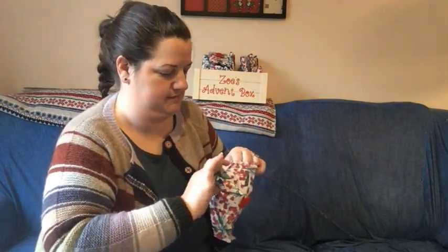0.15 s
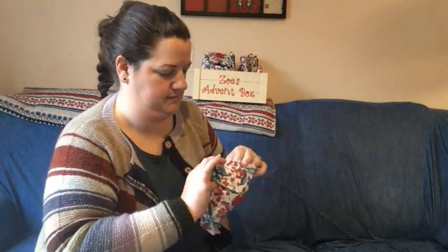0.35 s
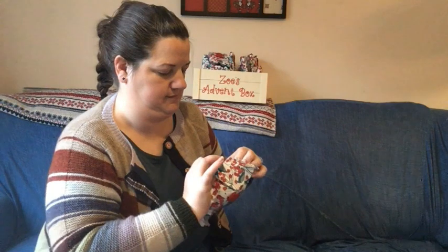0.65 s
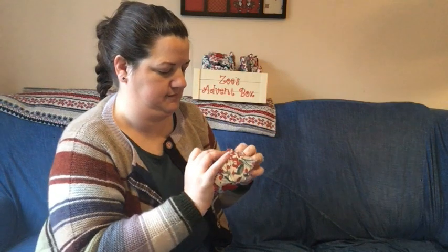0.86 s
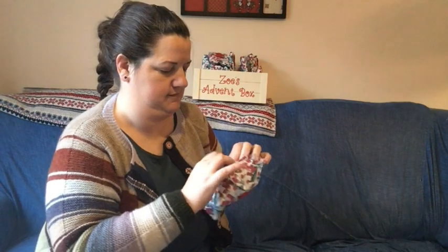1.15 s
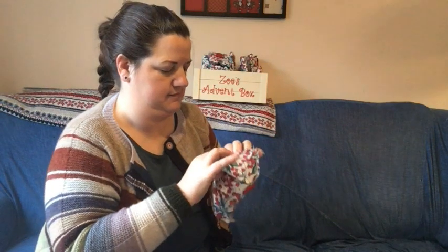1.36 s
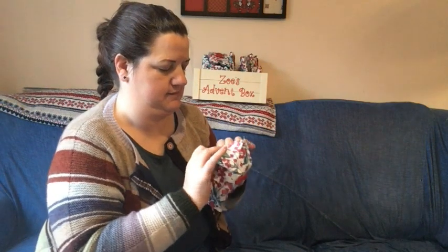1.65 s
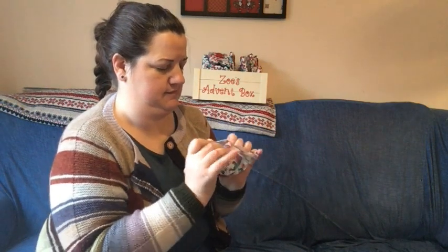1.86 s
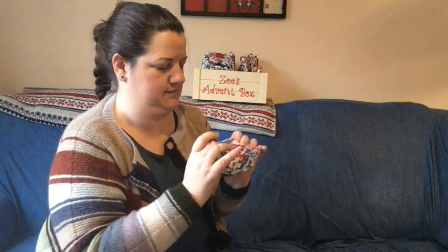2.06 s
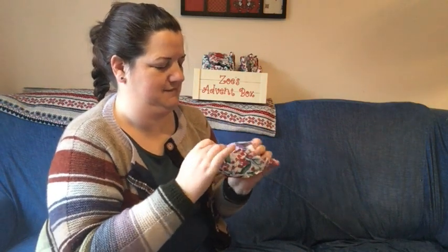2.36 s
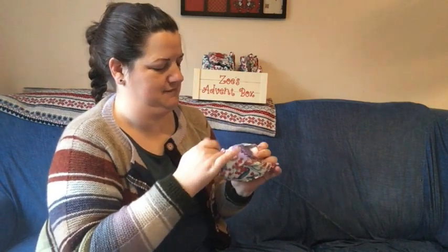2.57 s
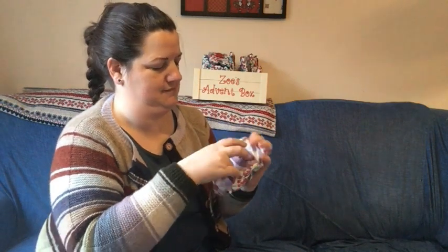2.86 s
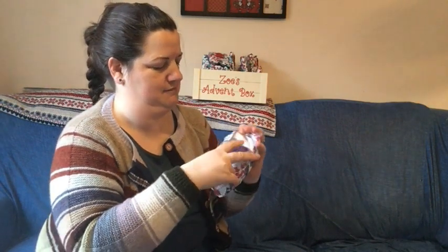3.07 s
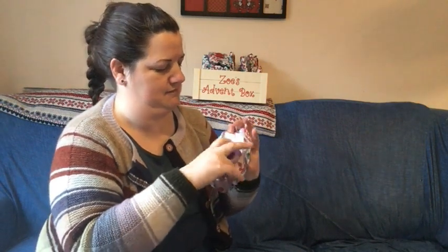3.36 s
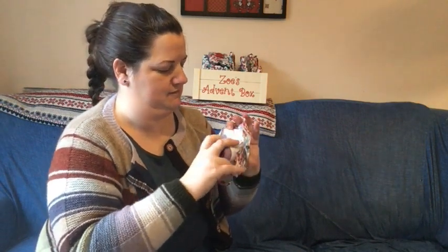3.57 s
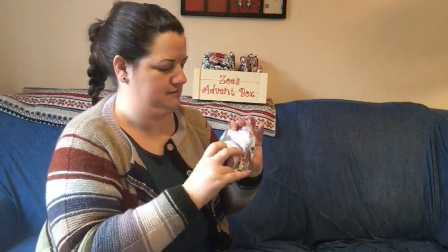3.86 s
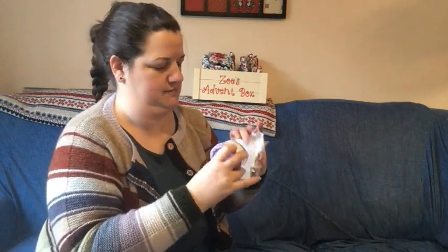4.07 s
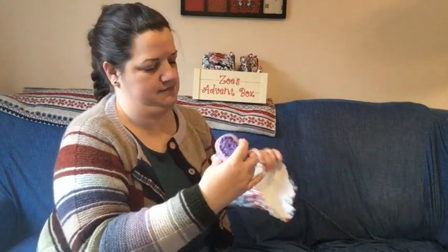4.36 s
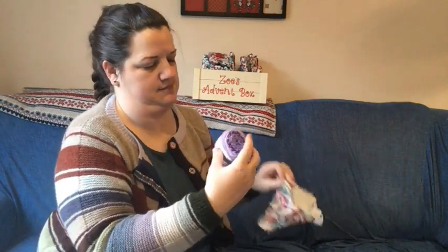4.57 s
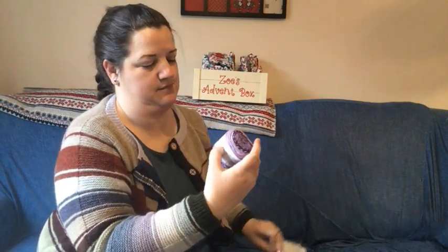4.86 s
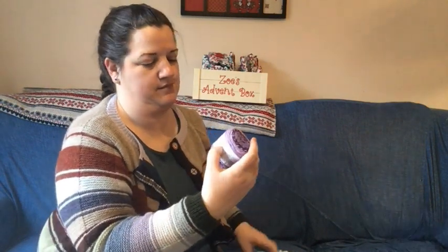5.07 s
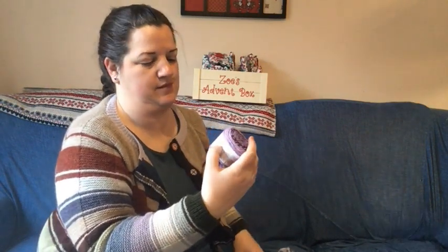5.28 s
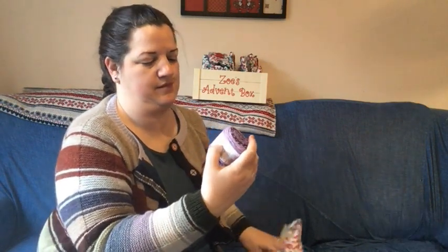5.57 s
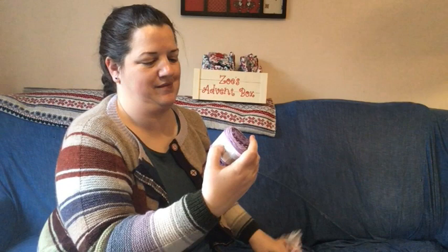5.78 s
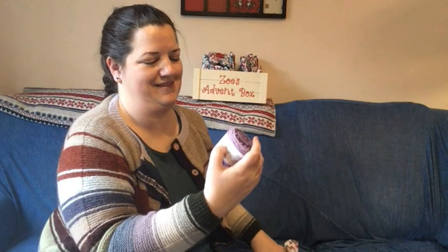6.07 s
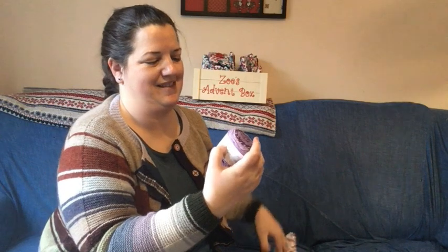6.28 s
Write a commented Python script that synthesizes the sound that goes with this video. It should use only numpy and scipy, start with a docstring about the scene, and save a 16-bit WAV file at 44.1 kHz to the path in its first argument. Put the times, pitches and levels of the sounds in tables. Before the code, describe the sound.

Stiff wrapping paper is handled fairly close by in a quiet living room, over a faint, steady low hum. From the start it rustles in short, uneven strokes, with loud, sharp snaps between about 0.5 and 0.9 seconds. After lighter picking, a quick, loud rip comes at 1.7 seconds, followed by a slower, thinner tear from about 2.3 to 2.5 seconds. Dense crinkling continues as the small gift is eased out, with a strong crackle at 3 seconds and a few soft hand bumps. The rustle softens, and from about 4.1 to 4.8 seconds there are only slight paper sounds. Crackling then returns as the wrap is put down, with soft, low thuds on a cushion around 5.1 and 5.7 seconds. A few more snaps and light rustles follow until about 6.4 seconds. Each crackle has a short room tail.

```python
"""Stiff paper rustles and snaps over a faint room hum: a small gift is being unwrapped by hand on a sofa.
The rustle is a swarm of tiny buckles and sliding sheets; each snap is a crease flipping through and ringing
a facet of the paper. Hands bump softly on parcel and cushion. Fibres break in a quick rip, then a slower
tear, and the wrap is pulled off and put down. A short living-room tail follows every crackle."""
import sys
import numpy as np
from scipy import signal
from scipy.fft import rfft, irfft
from scipy.io import wavfile

SR = 44100
rng = np.random.default_rng(int(sys.argv[2]) if len(sys.argv) > 2 else 0)


def inscribe(sig):
    """Save sig as 16-bit PCM at rate SR to the path in sys.argv[1].

    A 1-D sig is mono; a 2-D sig holds one channel per row.
    Samples are clipped to [-1, 1] before scaling.
    """
    pcm = np.round(np.clip(np.atleast_2d(sig).T, -1, 1) * 32767)
    wavfile.write(sys.argv[1], SR, pcm.astype(np.int16))


N = 282681

# Colour of the room tone. Each row: frequency in Hz, relative density in dB.
ROOM_TONE_COLOUR = [(12, -46.5), (20, -12), (45, -3.5), (65, -5), (98, 1), (146, -16.5), (182, -12.5),
                    (377, -14.5), (6180, -29), (16000, -33.5)]
# How hard the paper is held between strokes. Each row: time in seconds, rustle level in dB.
GRIP_CURVE = [(0, -56.5), (1.1, -55), (1.38, -61), (1.9, -53.5), (2.15, -57.5), (2.7, -53), (3.15, -56),
              (3.55, -55.5), (4.05, -52), (4.14, -71), (4.74, -71), (4.84, -61), (5.25, -51.5), (5.52, -54),
              (5.65, -59), (5.97, -55), (6.08, -66), (6.41, -58)]
# Finger strokes that pick at the fold, open the tear, ease the gift out, take the wrap away and press it
# down. Each row: start in seconds, length in seconds, rustle level in dB, brightness in dB, flex in dB.
FINGER_STROKES = [(0.168, 0.054, -53.5, 4.5, 2), (0.393, 0.025, -39, -1.5, 2.5),
                  (0.562, 0.065, -49, 8.5, 13), (0.636, 0.052, -35, 6.5, 4.5), (0.818, 0.082, -36, -2, -6),
                  (1.01, 0.017, -35.5, 3, 4), (1.23, 0.038, -48.5, 3.5, 4), (1.543, 0.16, -46.5, -5.5, 9.5),
                  (1.772, 0.056, -40, 3, 6), (1.958, 0.11, -51, 0.5, 10), (2.195, .01, -41, 1, -7),
                  (2.264, .26, -51, 14.5, 12), (2.738, 0.017, -39.5, -1, 12.5),
                  (2.818, 0.19, -43.5, 5, 0.5), (2.981, 0.033, -35, 6.5, 5.5),
                  (3.078, .035, -48.5, 1, 16.5), (3.213, 0.028, -45, 5, 11), (3.286, 0.15, -49.5, 12, 3.5),
                  (3.61, 0.25, -49, -4, 5), (3.819, 0.28, -50, 2, 2.5), (4.387, 0.042, -51.5, 3.5, 2.5),
                  (4.493, 0.028, -55, 8, 8.5), (4.788, 0.044, -55, 10.5, 3), (4.835, 0.19, -51.5, 11, 6.5),
                  (5.053, 0.051, -44, 8.5, 1), (5.141, 0.035, -36.5, -6, 8), (5.297, 0.024, -41, 12, 1),
                  (5.358, 0.063, -51.5, 9, 7), (5.555, 0.03, -36, -0.5, -5), (5.71, 0.072, -42, 2.5, 4.5),
                  (6.112, 0.054, -52.5, 11, 9.5), (6.278, 0.024, -43, 0, 8.5),
                  (6.327, 0.062, -51.5, -11, 4)]
# Colour of the rustle. Each row: frequency in Hz, relative density in dB.
RUSTLE_COLOUR = [(76, -45), (130, -18.5), (280, -3.5), (430, -4), (630, 0.5), (1220, 4.5), (1680, 1.5),
                 (1890, 3.5), (2510, -1), (3910, -7), (4880, -10.5), (9670, -13), (13600, -22),
                 (16000, -28.5)]
# The featured creases snapping through. Each row: start in seconds, facet level over 5 ms in dB,
# facet pitch in Hz, crack in dB against the facet, sheet flex in dB against the facet.
LOUD_CREASES = [(0.0852, -27.5, 2310, -15.5, -9.5), (0.2392, -40.5, 623, -19, -8),
                (0.4676, -25, 1580, -11, -27), (0.4704, -14.5, 1490, -11.5, -20.5),
                (0.5818, -30, 2020, -7, -9), (0.6486, -18, 1220, -7.5, -16), (0.6602, -25, 1800, -9, -28),
                (0.6984, -16, 1250, -14.5, -18), (0.8996, -25, 2900, -9, -17),
                (0.9163, -40.5, 1660, -3.5, 4), (1.0224, -36, 2150, 1.5, 0), (1.2312, -40, 804, -13, 6),
                (1.3428, -45, 1190, -26, -1.5), (1.5391, -38, 2780, -21.5, -19.5),
                (1.5491, -26, 1230, -30, -7.5), (1.6196, -33.5, 1580, -31, -16),
                (1.6778, -15, 1660, -8.5, -27), (1.8266, -29.5, 2570, -9, -28),
                (1.9061, -36, 1340, -17, -3), (1.9313, -39.5, 2810, 0.5, -19), (1.9602, -40, 1600, -3, -20),
                (2.0118, -41, 2410, -21, -10), (2.1805, -28.5, 2460, -8.5, -14),
                (2.2667, -35.5, 1970, -10, -20), (2.3096, -33, 2030, -11, -22),
                (2.3548, -33, 2120, -8, -20), (2.3876, -34, 1970, -5, -20), (2.4261, -33.5, 1950, -9, -20),
                (2.6537, -34.5, 1450, -16, -4), (2.7264, -38, 1290, -10, -2), (2.7424, -34, 1610, -5, -12),
                (2.7878, -31, 705, -1, -23), (2.8357, -34.5, 1640, -26, -18), (2.9861, -21.5, 1980, -2, -8),
                (3.0361, -33.5, 970, -17, 3), (3.1974, -28.5, 1730, -8.5, -17),
                (3.3429, -36.5, 1720, -8, -22), (3.4877, -39, 1620, -23, -23),
                (3.9404, -39.5, 1730, -3, -17), (4.0146, -36, 940, -8, -5), (4.1953, -56.5, 470, -2, 2.5),
                (4.4202, -47, 1050, -9, -18), (4.8877, -38, 1730, 1.5, -8), (4.969, -35.5, 2680, -4, -20),
                (5.1006, -35, 1880, -11, 2.5), (5.1454, -26, 2830, -3, -2), (5.1503, -26, 1250, -5, -10),
                (5.2982, -39.5, 3050, -1.5, -18), (5.3127, -33, 3460, -13, -29),
                (5.4654, -35, 2150, -1.5, -23), (5.7875, -24.5, 1660, -26, -18),
                (5.9346, -24, 2470, -8, -20.5), (6.2868, -34.5, 980, -8.5, -8)]
# The room's tail. Each row: frequency in Hz, time to fall 60 dB in seconds, wet level in dB against dry.
ROOM_TAIL = [(150, 0.57, -9), (590, 0.24, -8.5), (1580, 0.28, -7), (4000, 0.32, -6), (7800, 0.33, -5),
             (15000, 0.14, -10)]
# Hands meeting parcel and cushion. Each row: start in seconds, level in dB before softening, pitch in Hz.
HAND_BUMPS = [(0.654, -51, 150), (2.744, -45, 186), (2.985, -47, 159), (3.196, -38.5, 185),
              (3.942, -40, 160), (5.075, -37, 84), (5.142, -43, 130), (5.161, -33, 67), (5.716, -38, 150),
              (5.734, -41, 65), (5.937, -45, 95)]
# Envelope of the quick rip. Each row: time in seconds, level in dB.
RIP_PULL = [(1.666, -60), (1.67, -26), (1.678, -19.5), (1.69, -19.5), (1.72, -25.5), (1.77, -25.5),
            (1.778, -60)]
# Colour of the quick rip. Each row: frequency in Hz, relative density in dB.
RIP_SPECTRUM = [(140, -24.5), (300, -11.5), (600, -3.5), (900, -3), (1500, -7), (2400, -4), (4500, -10),
                (9000, -11), (16000, -24)]
# Envelope of the slower, thinner tear. Each row: time in seconds, level in dB.
TEAR_PULL = [(2.255, -41), (2.267, -34.5), (2.29, -40), (2.31, -31.5), (2.37, -38.5), (2.39, -37),
             (2.45, -40), (2.5, -55)]
# Colour of the slower tear. Each row: frequency in Hz, relative density in dB.
TEAR_SPECTRUM = [(76, -50), (130, -20), (601, -16), (1060, -10.5), (1890, -3), (2560, -11), (3070, -8),
                 (4980, -18), (7750, -12.5), (16000, -25)]

BAND_EDGES_HZ = np.geomspace(125, 17000, 19)
CUTOFF_HZ = 16000


def from_db(db):
    """Decibels to gain."""
    return 10 ** (np.asarray(db) / 20)


def rms_one(x):
    """Scale to rms 1."""
    return x / np.sqrt(np.mean(x ** 2) + 1e-20)


def at_hz(points, hz):
    """Each column of a spectrum table, read on a log-frequency axis."""
    known, *columns = np.transpose(points)
    return [np.interp(np.log(hz), np.log(known), c) for c in columns]


def filtered(x, edges_hz, kind):
    """Second-order Butterworth filter."""
    return signal.sosfilt(signal.butter(2, edges_hz, kind, fs=SR, output="sos"), x + 1e-18)


def drift(per_s, size=N):
    """Random wander of rms 1 that finds a new target per_s times a second."""
    knots = rng.standard_normal(int(per_s * size / SR) + 2)
    return rms_one(np.interp(np.arange(size) * per_s / SR, np.arange(len(knots)), knots))


def ring(push, hz, cycles):
    """A resonance that dies by 60 dB within so many cycles."""
    w = 2 * np.pi * min(hz, SR / 2) / SR
    r = np.exp(-np.log(1000) * hz / (cycles * SR))
    return signal.lfilter([0, np.sin(w)], [1, -2 * r * np.cos(w), r * r], push)


def add(track, start_s, sound):
    """Mix a sound into the track at start_s."""
    start = int(np.clip(start_s * SR, 0, N - 1))
    track[start:start + len(sound)] += sound[:N - start]


def room_tone(air_db=-61.5, hum_hz=95, hum_db=-68.5, waver_db=3.0):
    """The bed: steady room noise and a faint, wavering hum."""
    hz = np.maximum(np.fft.rfftfreq(N, 1 / SR), 1)
    air = irfft(rfft(rng.standard_normal(N)) * from_db(at_hz(ROOM_TONE_COLOUR, hz)[0]), N)
    hum = np.sin(2 * np.pi * hum_hz * np.arange(N) / SR + .5 * drift(per_s=3.1))
    hum *= from_db(waver_db * drift(per_s=17))
    return from_db(air_db) * rms_one(air) + from_db(hum_db) * rms_one(hum)


def hands(attack_s=0.018, release_s=0.018, slope_db=-2, grip_bright_db=4.5, grip_flex_db=10.5):
    """Grip and strokes ride the rustle's level, brightness and flex, in dB; the strongest leads the tone."""
    t = np.arange(N) / SR
    power = from_db(np.interp(t, *np.transpose(GRIP_CURVE))) ** 2
    bright, flex = power * grip_bright_db, power * grip_flex_db
    for start, length, level_db, bright_db, flex_db in FINGER_STROKES:
        # a stroke takes hold, eases along its length and dies away
        attack = np.clip(1 + (t - start) / attack_s, 0, 1) ** 2
        along = np.clip((t - start) / length, 0, 1)
        release = np.exp(-np.clip((t - start - length) / release_s, 0, 20))
        stroke = (attack * release * from_db(level_db + slope_db * (along - .5))) ** 2
        power += stroke
        bright += stroke * bright_db
        flex += stroke * flex_db
    return 10 * np.log10(power), bright / power, flex / power


def crinkle(colour, per_s, slide_db, clump_db, patchy_db, size=N):
    """Tiny buckles, each with its own colour, over the hiss of sliding paper, as (Hz, band) pairs."""
    sizes = 1 + np.minimum(rng.exponential(1, size), 3)   # many small buckles, few large
    buckles = rms_one(sizes * (rng.random(size) < per_s / SR))
    stick_slip_db = clump_db * drift(per_s=170, size=size)
    centres = np.sqrt(BAND_EDGES_HZ[:-1] * BAND_EDGES_HZ[1:])
    gains = from_db(at_hz(colour, centres)[0]) * np.sqrt(np.diff(BAND_EDGES_HZ))
    gains /= np.linalg.norm(gains)
    bands = []
    for hz, gain, low, high in zip(centres, gains, BAND_EDGES_HZ, BAND_EDGES_HZ[1:]):
        push = (buckles + from_db(slide_db)) * rng.standard_normal(size)
        flicker = from_db(stick_slip_db + patchy_db * drift(per_s=50, size=size))
        band = filtered(push, [low, high], "band") * flicker
        bands.append((hz, gain * rms_one(band)))
    return bands


def rustle(effort_db, bright_db, flex_db):
    """Fingers rub and bend the wrap; brightness works as a high shelf, flex as a low shelf."""
    out = np.zeros(N)
    for hz, band in crinkle(RUSTLE_COLOUR, per_s=600, slide_db=3.0, clump_db=3.0, patchy_db=3.5):
        high_shelf = at_hz([(2000, 0), (6500, 1)], hz)[0]
        low_shelf = at_hz([(480, 1), (1100, 0)], hz)[0]
        out += band * from_db(high_shelf * bright_db + low_shelf * flex_db)
    return out * from_db(effort_db)


def dispersed(push, lag_at_1khz_s=0.000401):
    """Bending waves run faster the higher they are, so a click arrives as a tiny falling chirp."""
    hz = np.fft.rfftfreq(len(push), 1 / SR)
    phase = 4 * np.pi * lag_at_1khz_s * np.sqrt(1000 * hz)
    return irfft(rfft(push) * np.exp(-1j * phase), len(push))


def snaps(creases, facet_cycles=4.8, upper_ratio=1.98, upper_db=-10, facet_top_hz=4200,
          crack_s=0.0023, crack_low_hz=4000, crack_top_hz=14000, dulling=0.75,
          flex_hz=480, flex_cycles=6.0, splinter_db=-25, splinter_s=0.0045):
    """A crease flips: its facet rings for a few cycles, the fold cracks and the sheet around it flexes."""
    out, t = np.zeros(N), np.arange(SR // 50) / SR
    grit = rng.standard_normal((len(creases), 3, len(t)))
    for (start, level_db, hz, crack_db, flex_db), (noise, splinters, detune) in zip(creases, grit):
        # one sharp flip, trailed by splinters along the fold
        push = dispersed((t == 0) + from_db(splinter_db) * splinters * np.exp(-t / splinter_s))
        upper = ring(push, hz * upper_ratio * from_db(detune[0]), facet_cycles)
        facet = rms_one(ring(push, hz, facet_cycles)) + from_db(upper_db) * rms_one(upper)
        facet = filtered(facet, [hz * 2 / 3, max(facet_top_hz, hz)], "band")   # too small to radiate bass
        crack = filtered(np.tanh(2 * noise) * np.exp(-t / crack_s), crack_low_hz, "high")
        top_hz = min(crack_top_hz * from_db(dulling * crack_db), CUTOFF_HZ)   # weak cracks are duller
        crack = filtered(crack, top_hz, "low")
        flex = np.diff(ring(push, flex_hz * from_db(detune[1]), flex_cycles), prepend=0)
        snap = rms_one(facet) + from_db(crack_db) * rms_one(crack) + from_db(flex_db) * rms_one(flex)
        add(out, start, from_db(level_db) * snap / 2)   # the energy sits in the first 5 of these 20 ms
    return out


def echoes(first_s=0.0031, build_s=0.00067, lumpy_db=1.0):
    """Reflections from near walls thicken into a short tail that dies band by band."""
    t = np.arange(SR // 2) / SR
    hz = np.fft.rfftfreq(len(t), 1 / SR)
    onset = 1 - np.exp(-np.maximum(t - first_s, 0) / build_s)
    scatter = rfft(rng.standard_normal(len(t)) * from_db(lumpy_db * rng.standard_normal(len(t))))
    tail = np.zeros(len(t))
    for low, high in zip(BAND_EDGES_HZ, BAND_EDGES_HZ[1:]):
        t60, wet_db = at_hz(ROOM_TAIL, np.sqrt(low * high))
        band = irfft(scatter * ((hz >= low) & (hz < high)), len(t))
        band *= onset * np.exp(-np.log(1000) * t / t60)
        tail += from_db(wet_db) * band / np.linalg.norm(band) * np.sqrt(2 * (high - low) / SR)
    return tail


def room_reverb(handling, places=7):
    """The parcel keeps moving, so its echoes crossfade; a snap sounds different towards each wall."""
    out, place = np.zeros(N), np.linspace(1, places, N)
    towards_walls = [snaps(LOUD_CREASES) for _ in range(3)]
    for k in range(places + 2):
        share = np.maximum(2 - np.abs(place - k), 0) / 4   # neighbouring places sum to 1
        near = np.flatnonzero(share)
        send = (handling + towards_walls[k % len(towards_walls)]) * np.sqrt(share)
        add(out, near[0] / SR, signal.fftconvolve(send[near], echoes()))
    return out


def small_snaps(effort_db, per_s=9, above_effort_db=2.5, spread_db=4, ceiling_db=-44.5,
                centre_hz=1536, spread_octaves=.55, candidates=200):
    """Small creases give way at random, louder the harder the hands work the paper."""
    when, chance = rng.random((2, candidates))
    size, pitch = np.clip(rng.standard_normal((2, candidates)), -2, 2)
    level_db = np.minimum(effort_db[(when * N).astype(int)] + above_effort_db + spread_db * size, ceiling_db)
    octaves = spread_octaves * pitch
    crack_db = -13.5 + 6.5 * octaves   # a small, high facet cracks more
    flex_db = -10.5 - 5.5 * octaves   # and moves the sheet less
    creases = np.column_stack([when * N / SR, level_db, centre_hz * 2 ** octaves, crack_db, flex_db])
    return snaps(creases[chance < per_s * N / SR / candidates])


def hand_bumps(cycles=5.8, soft_hz=300):
    """A soft push of the hands draws a short, low thud from parcel or cushion."""
    out = np.zeros(N)
    push = filtered(signal.unit_impulse(SR // 5), soft_hz, "low")
    for start, level_db, hz in HAND_BUMPS:
        add(out, start, from_db(level_db) * ring(push, hz, cycles))
    return out


def tear(pull, colour, fibres_per_s, clump_db):
    """A tear crosses the sheet: fibres break in a dense, uneven run as long as the pull lasts."""
    times, pull_db = np.transpose(pull)
    t = times[0] + np.arange(SR // 3) / SR
    bands = crinkle(colour, fibres_per_s, slide_db=-8.0, clump_db=clump_db, patchy_db=2.0, size=len(t))
    fibres = sum(band for _, band in bands)
    envelope = from_db(np.interp(t, times, pull_db)) * (t < times[-1])
    out = np.zeros(N)
    add(out, times[0], fibres * envelope)
    return out


def scene():
    """The mono mix: loud snaps up front, paper handling around them, reverb and room tone behind."""
    effort_db, bright_db, flex_db = hands()
    rip = tear(RIP_PULL, RIP_SPECTRUM, fibres_per_s=4000, clump_db=1.1)
    slow_tear = tear(TEAR_PULL, TEAR_SPECTRUM, fibres_per_s=1800, clump_db=3.0)
    handling = rip + slow_tear + rustle(effort_db, bright_db, flex_db) + hand_bumps() + small_snaps(effort_db)
    return (snaps(LOUD_CREASES) + handling + room_reverb(handling) + room_tone())[None]


def record(dry):
    """The microphone drops the deepest bass; the top is cut steeply."""
    top_cut = signal.ellip(10, .1, 80, CUTOFF_HZ, fs=SR, output="sos")
    return signal.sosfilt(top_cut, filtered(dry, 38, "high"))


dry = scene()
out = record(dry)
inscribe(out)
```